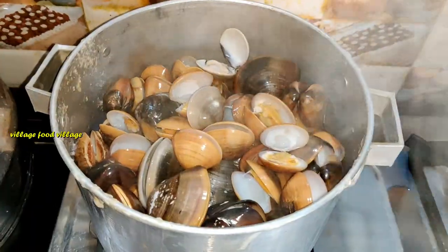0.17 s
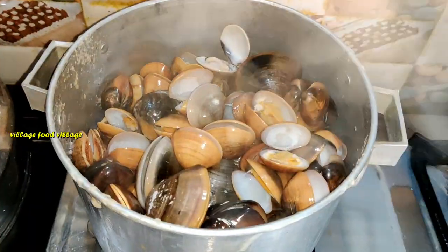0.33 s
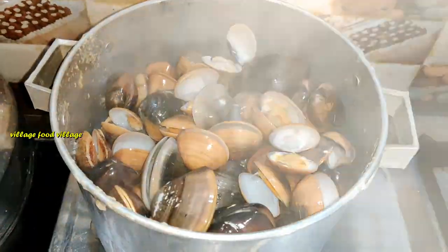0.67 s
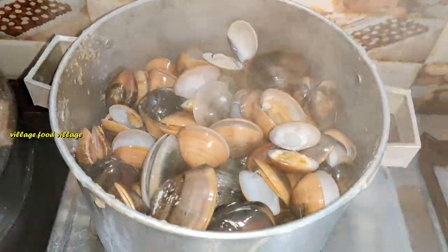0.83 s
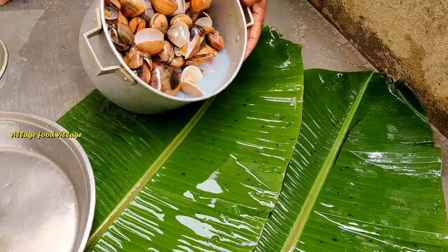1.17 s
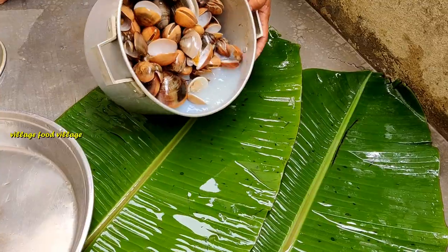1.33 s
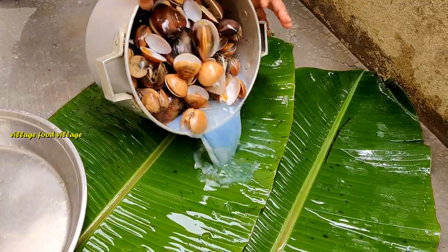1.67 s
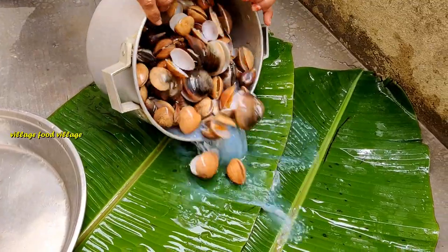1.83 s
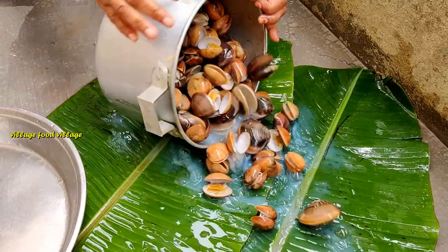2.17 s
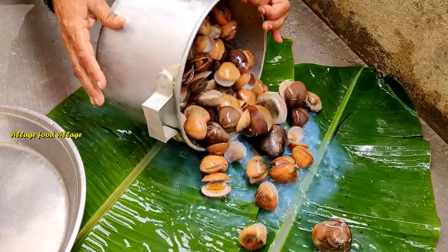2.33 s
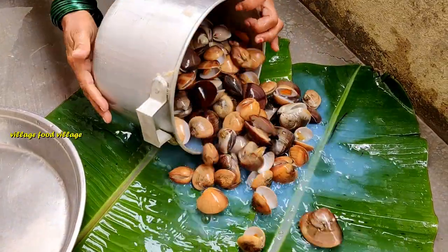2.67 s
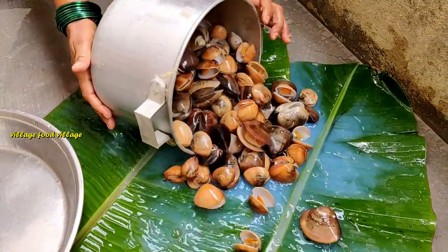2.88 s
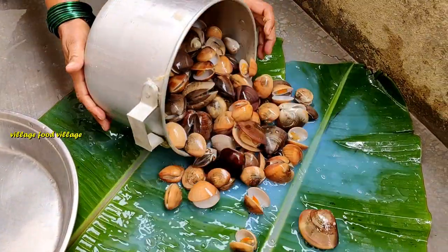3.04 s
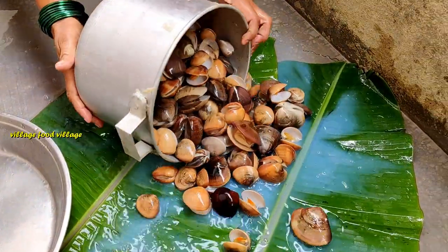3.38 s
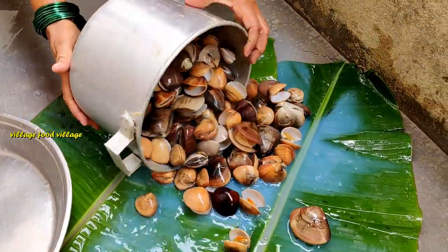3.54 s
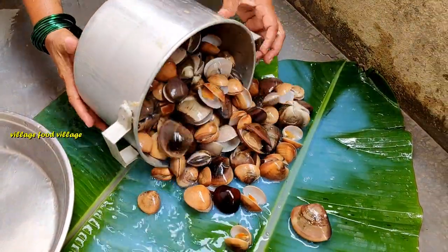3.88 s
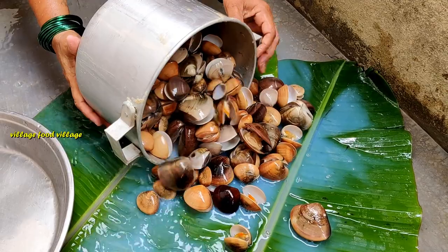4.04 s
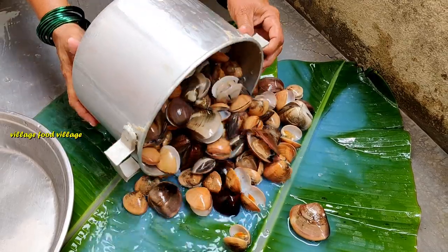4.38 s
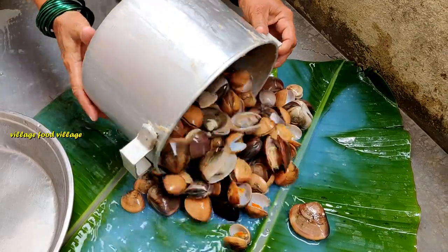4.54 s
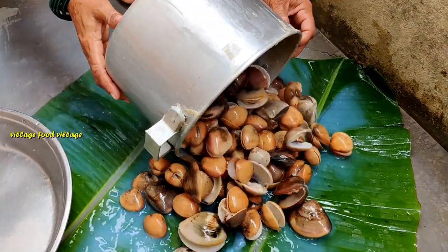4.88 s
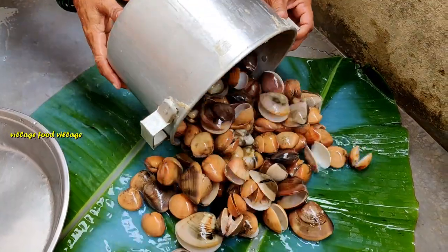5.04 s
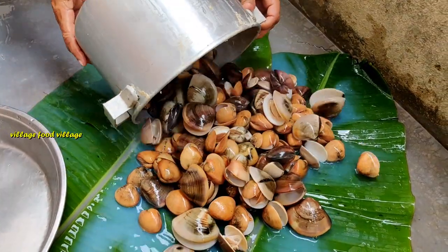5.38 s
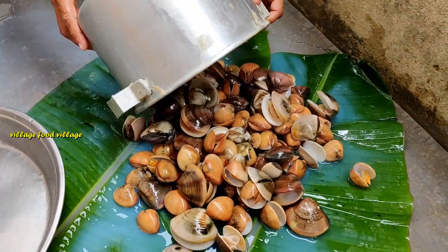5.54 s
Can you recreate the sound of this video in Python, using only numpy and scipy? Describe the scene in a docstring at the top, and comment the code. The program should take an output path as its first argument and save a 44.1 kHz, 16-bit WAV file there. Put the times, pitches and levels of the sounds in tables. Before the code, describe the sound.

A pot of clams steams quietly indoors, then is tipped outdoors: wet shells clatter and clack in surges over splashing, gurgling broth.

```python
"""Boiled clams tipped out of a pot

A pot of clams steams quietly in a kitchen: noise through resonances, and a faint wavering whistle.
Then, outdoors, it is tipped onto a leaf on the ground and the heap gives way in surges. Broth splashes and gurgles
as decaying sines, wet shells clack on each other and on the aluminium pot as noise cracks with ringing modes,
and the heap slumps with a thud of low noise. Two close microphone ports each add their own resonances."""
import sys
import numpy as np
from scipy import signal
from scipy.fft import rfft, irfft, next_fast_len
from scipy.io import wavfile
from scipy.ndimage import map_coordinates

SR = 44100
rng = np.random.default_rng(int(sys.argv[2]) if len(sys.argv) > 2 else 0)


def output_pcm(signal):
    """Save a mono or channel-first signal as 16-bit PCM at the path in sys.argv[1].

    Samples are clipped to [-1, 1] before scaling.
    """
    pcm = np.clip(np.atleast_2d(signal).T, -1, 1) * 32767
    wavfile.write(sys.argv[1], SR, np.round(pcm).astype(np.int16))


N = 251811
OUTDOORS_S = 1.115  # the kitchen gives way to the yard


def amp(db):
    """Decibels to gain."""
    return 10 ** (np.asarray(db) / 20)


def unit(x):
    """x at rms 1."""
    return x / np.sqrt(np.mean(x ** 2) + 1e-20)


def along(points, hz):
    """(Hz, value) points read on a log frequency axis."""
    f, v = np.transpose(points)
    return np.interp(np.log(hz + 1), np.log(f + 1), v)


def curves(rows):
    """One value per sample for each column after the time."""
    s, *cols = np.transpose(rows)
    return [np.interp(np.arange(N) / SR, s, c) for c in cols]


def wobble(rate):
    """A smooth random curve, rate knots a second."""
    knots = rng.standard_normal(int(N * rate / SR) + 4)
    return map_coordinates(knots, [np.arange(N) * rate / SR])


def filtered(x, response):
    """x times a (complex) response of frequency."""
    m = next_fast_len(N + SR // 2)
    return irfft(rfft(x, m) * response(np.fft.rfftfreq(m, 1 / SR)), m)[..., :N]


def coloured(x, points, size=2048):
    """x through a causal minimum-phase filter with the given (Hz, dB) shape."""
    cepstrum = irfft(np.log(amp(along(points, np.fft.rfftfreq(size, 1 / SR)))))
    cepstrum[1:size // 2] *= 2
    cepstrum[size // 2 + 1:] = 0
    impulse = irfft(np.exp(rfft(cepstrum)))
    return signal.fftconvolve(x, impulse)[:N]


def resonances(x, modes):
    """x through parallel resonances, each (Hz, width Hz, dB)."""
    def response(f):
        return sum(amp(db) * 1j * f * w / (c * c - f * f + 1j * f * w) for c, w, db in modes)
    return filtered(x, response)


def noise(spectrum):
    """Independent noise at each port, rms 1 overall, with a (Hz, dB) spectrum."""
    return unit(filtered(rng.standard_normal((2, N)), lambda hz: amp(along(spectrum, hz))))


def add(track, s, sound):
    """Mix a stereo sound into the track at time s."""
    start = int(np.clip(round(s * SR), 0, N - 1))
    track[:, start:start + sound.shape[1]] += sound[:, :N - start]


def grains(count, pitch_hz, spread, cycles, scatter_db, glide, size):
    """Small rings at random moments, 60 dB down after `cycles`, out of phase between ports; rms 1."""
    when, strength, phase = rng.random((count, 3)).T
    start = (when * N).astype(int)[:, None]
    hz = np.broadcast_to(pitch_hz, N)[start] * np.exp(spread * rng.standard_normal((count, 1)))
    hz = np.clip(hz, 100, SR / 2.2)
    t = np.arange(size) / SR
    age = np.minimum(hz * t / cycles, 2)
    attack = 1 - np.exp(-2 * hz * t)
    envelope = amp(scatter_db * strength[:, None] ** 2 - 60 * age) * attack
    turn = 2 * np.pi * hz * t * (1 + glide * age)
    where = (start + np.arange(size)).ravel()
    ports = [envelope * np.sin(turn + lag) for lag in (0, 2 * np.pi * phase[:, None])]
    return unit(np.array([np.bincount(where, p.ravel(), N)[:N] for p in ports]))


def contacts(count, scatter_db, t60):
    """Envelope of rms 1 of many short taps at random moments; their powers add."""
    when, strength = rng.random((count, 2)).T
    taps = np.bincount((when * N).astype(int), amp(scatter_db * strength ** 2) ** 2, N)
    decay = amp(-60 / (t60 * SR)) ** 2
    return unit(np.sqrt(signal.lfilter([1], [1, -decay], taps)))


# Room noise spectrum. Each row: frequency in Hz, relative density in dB.
KITCHEN_HZ_DB = [(20, 8), (60, 0), (130, 1.5), (230, -15.5), (310, -4.5), (600, -7.5), (1500, -15.5),
                 (2500, -24), (4300, -22.5), (6000, -32.5), (9000, -26), (15000, -32)]
# Steam hiss. Each row: time in seconds, level in dB before steam_db.
STEAM_S_DB = [(0, -67), (.3, -63), (.6, -58.5), (.8, -62), (1.1, -65)]
# Hiss resonances. Each row: frequency in Hz, width in Hz, relative level in dB.
STEAM_MODES = [(3150, 250, -11), (4400, 220, -5), (6440, 300, 6), (9000, 900, -18)]
# Steam whistle. Each row: time in seconds, mean pitch in Hz, level in dB.
WHISTLE_S_HZ_DB = [(0, 2050, -94), (.2, 2170, -78), (.4, 2240, -76), (.6, 2230, -78), (.85, 2140, -81),
                   (1.1, 2130, -82)]


def kitchen(level_db=-52, steam_db=-11, whistle_db=0, waver=0.0122):
    """Low room noise; steam hisses from the pot and whistles faintly, its pitch never steady."""
    hiss_db, = curves(STEAM_S_DB)
    pitch_hz, tone_db = curves(WHISTLE_S_HZ_DB)
    hiss = unit(resonances(rng.standard_normal((2, N)), STEAM_MODES))
    steam = amp(hiss_db + steam_db) * hiss
    phase = 2 * np.pi * np.cumsum(pitch_hz * (1 + waver * wobble(33.9))) / SR
    flutter = np.array([wobble(120), wobble(120)])
    whistle = amp(tone_db + whistle_db) * unit(flutter * np.sin(phase))
    room = amp(level_db + 0.27 * wobble(8.2)) * noise(KITCHEN_HZ_DB)
    return room + steam + whistle


# Air and handling. Each row: time in seconds, mean level in dB.
HANDLING_S_DB = [(1.12, -41), (1.83, -38.5), (1.91, -49), (2.3, -41.5), (3.27, -39.5), (3.35, -48),
                 (3.58, -37.5), (4.1, -45), (4.7, -34.5), (5.2, -48.5), (5.71, -44.5)]
# Rumble spectrum. Each row: frequency in Hz, relative density in dB.
RUMBLE_HZ_DB = [(11, -25), (18, 0), (43, -1.5), (79, -4), (193, -19), (293, -24.5), (325, -17.5),
                (400, -33), (520, -13), (880, -120)]


def buffet(swing_db=2.2, rate=16):
    """Air and handling rumble low and unevenly on the ports: noise with a swinging level."""
    handling_db, = curves(HANDLING_S_DB)
    return amp(handling_db + swing_db * wobble(rate)) * noise(RUMBLE_HZ_DB)


# Decay of the reflections. Each row: frequency in Hz, t60 in seconds.
YARD_HZ_T60 = [(200, 0.15), (2500, 0.31), (7000, 0.14), (15000, 0.098)]


def yard(x, size=8192):
    """Ground and wall answer briefly, with a new random tail per block; the upper treble dies first."""
    track = np.zeros((2, N))
    for start in range(0, N, size):
        hz, t, z = signal.stft(rng.standard_normal((2, SR // 3)), SR, nperseg=256)
        decay = amp(-60 * t / along(YARD_HZ_T60, hz)[:, None])
        tail = signal.istft(z * decay, SR, nperseg=256)[1]
        tail = tail / np.linalg.norm(tail[0])
        answer = signal.fftconvolve(x[:, start:start + size], tail, axes=1)
        add(track, start / SR + .004, answer)
    return track


# The heap dropping on the ground. Each row: start in seconds, level in dB, t60 in seconds.
SLUMPS = [(4.75, -21, 0.19), (4.778, -16.5, 0.18), (4.82, -19.5, 0.2)]
# Thud spectrum. Each row: frequency in Hz, relative density in dB.
THUD_HZ_DB = [(15, -2), (45, -13.5), (110, -5), (220, -18), (330, -13), (600, -21), (3000, -92)]


def slump(attack_s=0.0053):
    """The bulk of the clams lands with a soft thud: low noise, decaying exponentially."""
    track, t = np.zeros((2, N)), np.arange(N) / SR
    for s, db, t60 in SLUMPS:
        attack = 1 - np.exp(-t / attack_s)
        add(track, s, amp(db - 60 * t / t60) * attack * noise(THUD_HZ_DB))
    return track


# The heap gives way. Each row: start in seconds, rise in seconds, length in seconds,
# then layer levels in dB for sliding shells, broth and spatter.
SURGES = [(1.34, 0.11, 0.44, -30, -43.5, -30.5), (1.628, .015, 0.26, -26, -41, -23.5),
          (2.032, 0.017, 0.72, -24, -34, -22.5), (2.744, 0.057, .46, -29, -38, -34),
          (3.381, 0.019, 0.12, -36, -46, -40), (3.527, .025, 0.33, -25, -32, -31.5),
          (4.018, 0.026, 0.1, -29.5, -41, -32), (4.251, 0.096, 0.2, -29, -31, -56),
          (4.386, 0.069, 0.53, -21.5, -35, -23), (4.946, 0.048, 0.08, -21.5, -32, -17),
          (5.149, .03, 0.37, -24.5, -35, -33), (5.548, 0.014, .03, -23.5, -33.5, -26.5),
          (5.641, 0.013, 0.066, -23, -35, -33)]
SAG_DB_PER_S, STOP_DB_PER_S = 2.5, 122  # while running; added after the length is up


def surge(levels_db, rest_db):
    """Level in dB of a layer that rises with each surge, sags, and falls back to rest; powers add."""
    power = amp(rest_db) ** 2
    for (s, rise_s, length_s, *_), db in zip(SURGES, levels_db):
        age = np.maximum(np.arange(N) / SR - s, 0)
        fade_db = SAG_DB_PER_S * age + STOP_DB_PER_S * np.maximum(age - length_s, 0)
        power = power + (np.minimum(age / rise_s, 1) * amp(db - fade_db)) ** 2
    return 10 * np.log10(power)


# median bubble pitch falls as the broth pools
FIRST_BUBBLE_HZ, LAST_BUBBLE_HZ, POOLING_S = 1180, 654, 1.7


def broth(broth_db, bubbles_db=-2, slap_db=-7):
    """Poured liquid slaps the leaf and traps bubbles, each rising in pitch as it surfaces."""
    poured_s = np.maximum(np.arange(N) / SR - OUTDOORS_S, 0)
    bubble_hz = LAST_BUBBLE_HZ + (FIRST_BUBBLE_HZ - LAST_BUBBLE_HZ) * np.exp(-poured_s / POOLING_S)
    bubbles = grains(count=1100, pitch_hz=bubble_hz, spread=.25, cycles=30, scatter_db=10, glide=.06, size=3000)
    slaps = grains(count=2400, pitch_hz=800, spread=.4, cycles=6, scatter_db=9, glide=0, size=900)
    return amp(broth_db) * (amp(bubbles_db) * bubbles + amp(slap_db) * slaps)


# Fine spatter spectrum. Each row: frequency in Hz, relative density in dB.
SPATTER_HZ_DB = [(2000, -23), (7000, -0.5), (11000, -3), (15500, -2.5)]


def spatter(spatter_db):
    """Droplets and wet films fizz: bright noise under many tiny taps."""
    return amp(spatter_db) * noise(SPATTER_HZ_DB) * contacts(count=6000, scatter_db=-8, t60=0.017)


# Large air pockets closing among the wet shells. Each row: start in seconds, first pitch in Hz, level in dB.
GLUGS = [(2.15, 900, -16.5), (2.203, 824, -20), (2.225, 845, -19.5), (2.548, 711, -22.5), (2.753, 790, -34),
         (3.598, 830, -19.5), (3.691, 580, -20.5), (3.731, 324, -31.5), (3.888, 462, -21),
         (4.042, 713, -28), (4.494, 753, -25), (4.599, 763, -26)]


def glugs(cycles=55, glide_per_s=0.58, attack_s=0.002):
    """A large bubble rings for a fixed number of cycles, rising a little in pitch."""
    track, t = np.zeros((2, N)), np.arange(SR // 4) / SR
    for s, hz, db in GLUGS:
        envelope = amp(db - 60 * hz * t / cycles) * (1 - np.exp(-t / attack_s))
        turns = hz * t * (1 + glide_per_s * t) + rng.random((2, 1)) / 10
        add(track, s, envelope * np.sin(2 * np.pi * turns))
    return track


# Shells catching the pot's rim. Each row: start in seconds, level in dB.
RIM_HITS = [(1.316, -43), (3.304, -27)]
# Aluminium rim modes. Each row: frequency in Hz, relative level in dB, t60 in seconds.
RIM_MODES = [(2500, -22, 0.11), (6140, -16, 0.16), (9500, 5, 0.18), (9400, 0, 0.16)]


def rim():
    """The pot's rim gives a brief metallic ring of decaying modes, damped by the hands that hold it."""
    track, t = np.zeros((2, N)), np.arange(SR // 2) / SR
    for s, db in RIM_HITS:
        for hz, mode_db, t60 in RIM_MODES:
            ring = np.sin(2 * np.pi * (hz * t + rng.random((2, 1))))
            add(track, s, amp(db + mode_db - 60 * t / t60) * ring)
    return track


def shell_band(lo_hz, hi_hz, modes_hz, ring_db, ring_t60=0.022, crack_t60=0.043, rebound=0.37, rise_s=0.00045,
               size=3072):
    """One band of a struck shell: a crack, a second one as it rocks, and the ring of any mode in band."""
    t = np.arange(size) / SR

    def at_full(x):
        """Rms 1 over the first 5 ms."""
        return x / np.sqrt(np.mean(x[:, :SR // 200] ** 2))

    again = t - rng.uniform(0.0011, 0.0044)
    attack = 1 - np.exp(-t / rise_s)
    first = attack * amp(-60 * t / crack_t60)
    second = rebound * (again > 0) * amp(-60 * np.abs(again) / crack_t60)
    edges = np.clip([lo_hz, hi_hz], 50, SR / 2.1)
    band = signal.butter(3, edges, 'band', fs=SR, output='sos')
    hit = at_full(signal.sosfilt(band, (first + second) * rng.standard_normal((2, size))))
    for hz in modes_hz:
        if lo_hz <= hz < hi_hz:
            ring = np.sin(2 * np.pi * (hz * t + rng.random((2, 1)) / 2)) * attack * amp(-60 * t / ring_t60)
            hit = hit + amp(ring_db) * at_full(ring)
    return at_full(hit)


# Shells thumping the pot's wall. Each row: start in seconds, level in dB.
WALL_KNOCKS = [(1.317, -23), (1.542, -24.5), (1.824, -27), (2.206, -25), (2.621, -22), (3.598, -25.5),
               (3.752, -24), (4.232, -16.5), (5.427, -23), (5.455, -24), (5.664, -23)]


def wall_knocks(lo_hz=1100, hi_hz=1750, ring_hz=1310):
    """A shell that meets the pot's wall gives a hollow, mid-pitched tock: one band with one mode."""
    track = np.zeros((2, N))
    for s, db in WALL_KNOCKS:
        tock = shell_band(lo_hz, hi_hz, (ring_hz,), ring_db=4, ring_t60=0.019, crack_t60=0.014)
        add(track, s, amp(db) * tock)
    return track


# Hollow of the pot. Each row: frequency in Hz, width in Hz, relative level in dB.
POT_MODES = [(314, 40, 17.5), (464, 12, -23), (730, 117, 2), (1305, 250, -3), (2080, 180, -35),
             (2600, 42, 2)]


def pot_hollow(shells, pot_db=-7):
    """The pot's hollow rings along with the shells inside it."""
    return amp(pot_db) * resonances(shells, POT_MODES)


# Sliding spectrum. Each row: frequency in Hz, relative density in dB.
SLIDE_HZ_DB = [(200, -44), (500, -6), (1000, 2.5), (2000, 1.5), (6000, 2.5), (10000, 2.5), (16000, -11)]


def sliding(slide_db, scrape_db=-8, ticks_db=-4):
    """Countless light contacts in the heap: dull scrapes and the small clinks of shell edges."""
    scrape = noise(SLIDE_HZ_DB) * contacts(count=2000, scatter_db=-5.5, t60=0.021)
    ticks = grains(count=6500, pitch_hz=4400, spread=.68, cycles=45, scatter_db=13, glide=0, size=800)
    ticks = unit(filtered(ticks, lambda hz: amp(along(SLIDE_HZ_DB, hz)) * np.sqrt(hz)))
    return amp(slide_db) * (amp(scrape_db) * scrape + amp(ticks_db) * ticks)


# Knock, body, clink and sizzle of a shell. Each row: low edge in Hz, high edge in Hz, trim in dB.
SHELL_BANDS = [(480, 1470, 2.5), (1410, 5170, -1), (3600, 7800, -3.5), (7030, 14850, 5)]
# clink: level before trim, usual pitch, occasional higher pitch, chance of the higher one
CLINK_DB, CLINK_HZ, HIGH_CLINK_HZ, HIGH_CLINK_SHARE = -10, 6025, 9750, 0.063
CLINK_SPREAD = 0.0397  # the clink's pitch strays up to twice this fraction
BODY_DB, BODY_PER_KNOCK = -2, 0.43  # before trim; a heavier knock brings out more body (dB per dB)
RING_DB, RING_SPREAD_DB = -2, 4.5  # ring against crack, random: some clacks ring, others are drier


def shell(low_hz, knock_db, sizzle_db, pan_db):
    """One struck shell: four bands of crack and ring, with random clink pitch, ring and top brightness."""
    pick, stray, ringing, brightness = rng.random(4)
    clink_hz = HIGH_CLINK_HZ if pick < HIGH_CLINK_SHARE else CLINK_HZ
    clink_hz = clink_hz * (1 + 2 * CLINK_SPREAD * (2 * stray - 1))
    ring_db = RING_DB + RING_SPREAD_DB * (2 * ringing - 1)
    levels_db = knock_db, BODY_DB + BODY_PER_KNOCK * knock_db, CLINK_DB, sizzle_db
    hit = sum(amp(band_db + trim_db) * shell_band(lo, hi, (low_hz, clink_hz), ring_db)
              for band_db, (lo, hi, trim_db) in zip(levels_db, SHELL_BANDS))
    # each clack gets its own random brightness above 11.5 kHz
    highpass = signal.butter(3, 11500, 'high', fs=SR, output='sos')
    top_db = -6 + 12 * brightness
    hit = hit + (amp(top_db) - 1) * signal.sosfiltfilt(highpass, hit)
    return hit * amp(pan_db * np.array([[.5], [-.5]]))


def rattle(slide_db, count=75, over_db=5, scatter_db=2.5, low_hz=2330, spread=0.081, knock_db=-26, knock_spread_db=6,
           sizzle_db=-13, sizzle_spread_db=4, pan_spread_db=4):
    """Lighter clacks at chance moments, their level following the sliding heap."""
    track, first_s = np.zeros((2, N)), SURGES[0][0]
    times = first_s + (np.arange(count) + rng.random(count)) / count * (N / SR - first_s)
    traits = np.clip(rng.standard_normal((count, 5)), -2, 2)
    for s, (force, pitch, knock, sizzle, place) in zip(times, traits):
        hit = shell(low_hz * np.exp(spread * pitch), knock_db + knock_spread_db * knock,
                    sizzle_db + sizzle_spread_db * sizzle, pan_spread_db * place)
        add(track, s, amp(slide_db[int(s * SR)] + over_db + scatter_db * force) * hit)
    return track


# The loudest shells striking. Each row: start in seconds, level in dB before level_db, low mode in Hz,
# knock in dB before band trim, sizzle in dB before band trim, left over right in dB before centring.
CLACKS = [(1.17, -11, 2380, -34, -19, 1.5), (1.222, -16, 2150, -31, -19, 6),
          (1.274, -3, 2650, -39.5, -14.5, 2.5), (1.315, -5.5, 1300, -28, -5.5, 7.5),
          (1.365, -14.5, 2500, -25.5, -15, 4), (1.465, -12.5, 2760, -16, -19, 1),
          (1.51, -9, 2750, -33, -29, 10), (1.534, -2, 2545, -29, -15.5, 5.5),
          (1.563, -2, 2500, -54, -17, 0.5), (1.605, -5.5, 2550, -31, -20.5, -3),
          (1.641, -12.5, 2980, -26, -6, 1), (1.655, -4, 2640, -20.5, -14, 6.5),
          (1.74, -8, 2750, -41, -23, 12.5), (1.792, -5.5, 2060, -31, -12, -5.5),
          (1.822, -5, 2490, -20, -11, 1.5), (1.867, -3.5, 2300, -41, -16, 4),
          (1.894, -7, 2380, -31, -12.5, 4), (1.946, -9.5, 2220, -13, -9, -1),
          (1.993, -4, 2200, -45, -23.5, 2.5), (2.045, -3, 2210, -32, -13.5, 4),
          (2.062, -10, 2620, -34, -16, 4), (2.088, -7, 1890, -18.5, -22, 1),
          (2.151, -1.5, 2060, -29, -15.5, 0), (2.211, -14.5, 2320, -18, -18, -7),
          (2.274, -3, 2700, -38, -13.5, 5), (2.374, -9.5, 2980, -21, -13, -7),
          (2.431, -4.5, 2200, -21.5, -11.5, -2), (2.498, -4.5, 2100, -40, -11.5, 8),
          (2.55, -5.5, 2010, -22, -15, -5), (2.621, -4, 1110, -24, -13.5, 3.5),
          (2.677, -3.5, 2680, -37, -16, 2), (2.701, -1, 2630, -36, -17, -1),
          (2.754, -7, 764, -16.5, -11.5, -1.5), (2.843, -8, 2400, -14, -14, 2),
          (2.878, -4, 1970, -25, -19, -1), (2.908, -9.5, 2410, -19, -7, 2.5),
          (2.956, -9.5, 1980, -30, -10.5, 7), (3.059, -4, 2630, -31, -17, 5),
          (3.1, -8.5, 2704, -19.5, -12.5, 5.0), (3.158, -11.5, 2610, -34, -9, 11),
          (3.253, -15, 2610, -22, -19, 4), (3.304, -5, 3480, -50, -14, 4),
          (3.395, -13.5, 2500, -37, -21, 4.5), (3.462, -8, 2550, -26.5, -19.5, 5),
          (3.541, -7, 2590, -23.5, -20, 7), (3.609, -15.5, 2120, -23, -22, 11),
          (3.661, -8.5, 2250, -32, -8, 1), (3.689, -9, 2220, -17, -30, 6), (3.706, -4, 2530, -35, -15.5, 1),
          (3.806, -7.5, 2430, -30, -16, 4.5), (3.833, -2.5, 2130, -33, -19, 0),
          (3.859, -9, 2660, -29, -14.5, -3), (3.888, -13, 2100, -11.5, -15.5, -6.5),
          (3.924, -14, 2275, -10.5, -32, 3), (3.966, -1.5, 2150, -26, -30, -1),
          (4.043, -9.5, 764, -9.5, -11.5, -0.5), (4.077, -10, 2320, -18, -14.5, -4),
          (4.109, -2, 2210, -29, -19.5, 0), (4.174, -13.5, 1980, -21, -16, -1),
          (4.231, -6.5, 1700, -21, -25, 1), (4.245, -12.5, 2260, -22, -20, 8),
          (4.306, -4.5, 2327, -24.5, -11.5, 3), (4.463, -5.5, 2063, -24.5, -13, 2.0),
          (4.484, -4, 2320, -28, -21.5, -9), (4.522, -3.5, 2200, -36, -30, 0),
          (4.597, -7.5, 2330, -17, -17, -9), (4.671, -4, 2230, -36, -19, -9),
          (4.705, -17, 2530, -18, -33, -3), (4.807, -4, 2530, -22.5, -14, -4.5),
          (5.0, -6, 2310, -26, -11, 0.0), (5.086, -10.5, 2225, -35, -5, 4.5),
          (5.128, -11.5, 2340, -19.5, -11, 8.0), (5.17, -12, 2070, -19, -24, 13),
          (5.218, -13, 2530, -27, -6, -0.5), (5.281, -5, 1950, -27, -14, 8),
          (5.361, -18, 2650, -28, -2.5, -6), (5.379, -5.5, 2130, -27, -14, -1),
          (5.397, -1.5, 2150, -26, -12, 2), (5.428, -3.5, 2570, -21, -12.5, 1.5),
          (5.451, -2.5, 2370, -23, -14, -4), (5.559, -4.5, 2100, -20.5, -13, -5.5),
          (5.664, -6, 2040, -20, -15, 3), (5.679, -4, 2650, -28, -20, -7),
          (5.699, -8.5, 2380, -21, -11, -6)]


def clacks(level_db=-5, width=0.99, centre_db=2):
    """Single shells that fall far and strike hard."""
    track = np.zeros((2, N))
    for s, db, low_hz, knock_db, sizzle_db, pan_db in CLACKS:
        hit = shell(low_hz, knock_db, sizzle_db, width * (pan_db - centre_db))
        add(track, s, amp(db + level_db) * hit)
    return track


# Treble tilt of the clacks: slight lift near 9.5 kHz, softer above 12 kHz.
# Each row: frequency in Hz, gain in dB.
CLACK_TILT_HZ_DB = [(2400, 0), (9500, 2.5), (12500, -2), (15500, -1)]
SETTLING_DB, DRIP_DB, FIZZ_DB = -49.5, -52, -53  # shells, broth and spatter between the surges
JOSTLE_DB, JOSTLE_RATE = 2.5, 35  # shells stick and slip: depth in dB, knots a second


def scene(yard_db=-7):
    """The kitchen, then the pour in the yard."""
    outdoors = np.clip((np.arange(N) / SR - OUTDOORS_S) / 0.0022, 0, 1)
    *_, slides, broths, spatters = np.transpose(SURGES)
    slide_db = surge(slides, SETTLING_DB)
    broth_db = surge(broths, DRIP_DB)
    spatter_db = surge(spatters, FIZZ_DB)
    shells = filtered(clacks() + rattle(slide_db), lambda hz: amp(along(CLACK_TILT_HZ_DB, hz)))
    shells = shells + outdoors * sliding(slide_db + JOSTLE_DB * wobble(JOSTLE_RATE))
    struck = shells + pot_hollow(shells) + wall_knocks() + rim()
    pour = struck + glugs() + outdoors * (spatter(spatter_db) + broth(broth_db))
    background = outdoors * buffet() + (1 - outdoors) * kitchen()
    return pour + amp(yard_db) * yard(pour) + slump() + background


# Microphone port resonances. Each row: frequency in Hz, gain in dB.
LEFT_PORT_HZ_DB = [(110, 1.5), (280, 2.5), (500, -8.5), (1000, -4.5), (1700, 1), (2150, 7.5), (2600, 5.5),
                   (3100, 1), (4300, 0), (5300, 7.5), (5950, 12.5), (6400, 9), (7400, -3), (9400, -6),
                   (11000, -15), (15500, -8)]
RIGHT_PORT_HZ_DB = [(110, 1.5), (280, 2.5), (500, -7.5), (1000, -5), (2500, 0.5), (3800, -1.5), (5000, 2.5),
                    (7200, -3), (8400, 1), (9300, 5.5), (10500, 1.5), (14000, -7.5), (15500, -7)]
# Left-right likeness. Each row: frequency in Hz, correlation given to independent ports (no unit).
ALIKE_HZ = [(40, .15), (160, .15), (350, .6), (780, .75), (1050, .15), (1650, -.1), (2150, .45), (2900, 0),
            (16000, 0)]
TOP_HZ = 15850


def record(dry):
    """Ports blend by frequency and add their own resonances; peaks are rounded, the band is limited."""
    def turn(hz):
        return np.arcsin(np.clip(along(ALIKE_HZ, hz), -1, 1)) / 2

    own = filtered(dry, lambda hz: np.cos(turn(hz)))
    crossed = filtered(dry[::-1], lambda hz: np.sin(turn(hz)))
    left, right = own + crossed
    x = np.array([coloured(left, LEFT_PORT_HZ_DB), coloured(right, RIGHT_PORT_HZ_DB)])
    x = x / (1 + np.abs(x / .85) ** 4) ** (1 / 4)
    return filtered(x, lambda hz: hz < TOP_HZ)


dry = scene()
out = record(dry)
output_pcm(out)
```